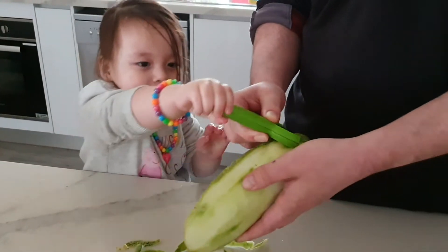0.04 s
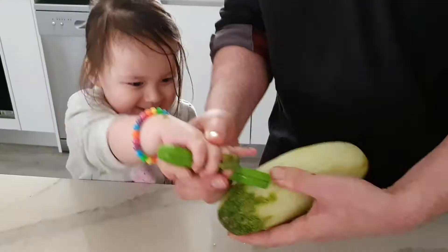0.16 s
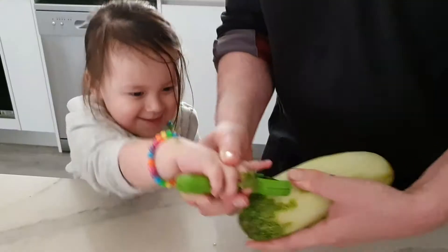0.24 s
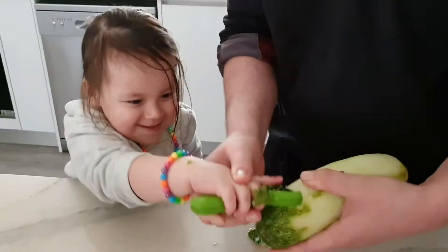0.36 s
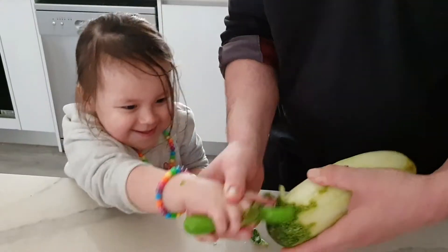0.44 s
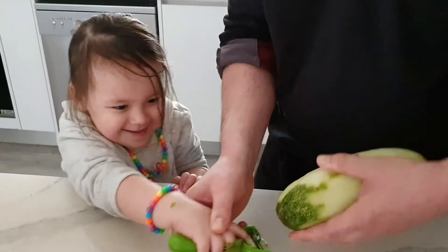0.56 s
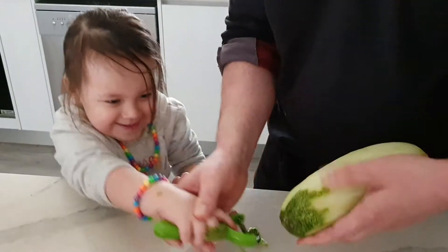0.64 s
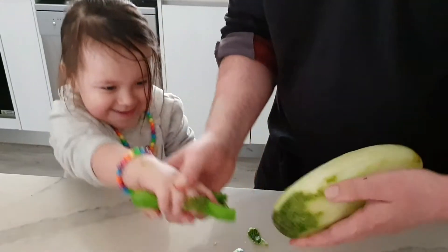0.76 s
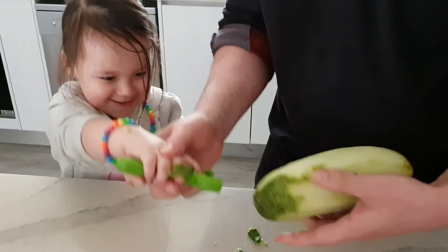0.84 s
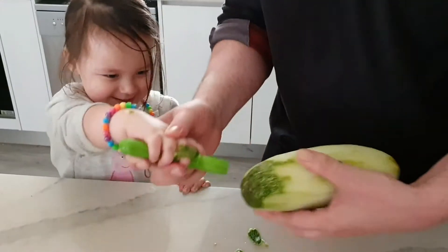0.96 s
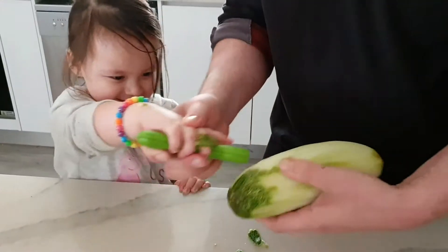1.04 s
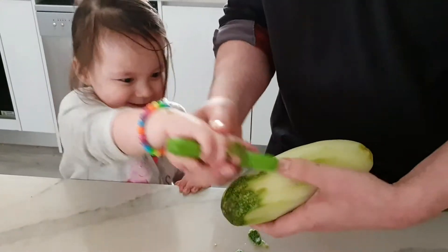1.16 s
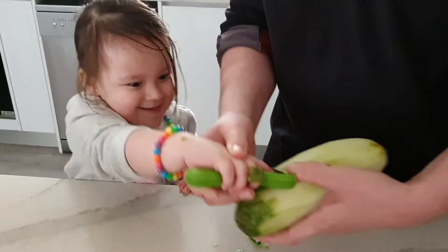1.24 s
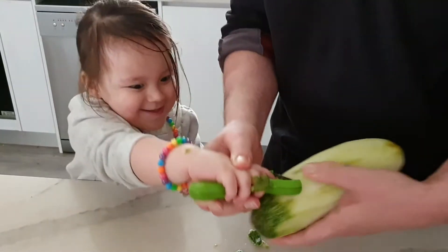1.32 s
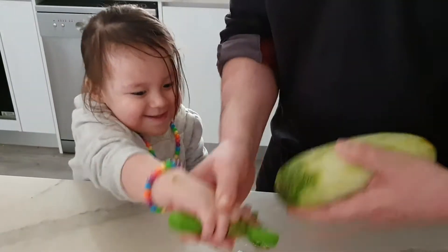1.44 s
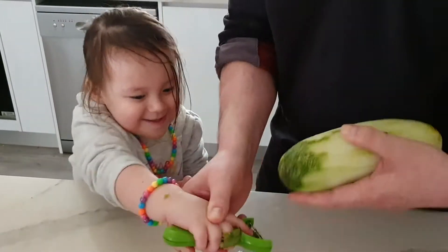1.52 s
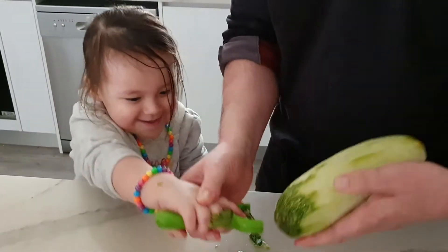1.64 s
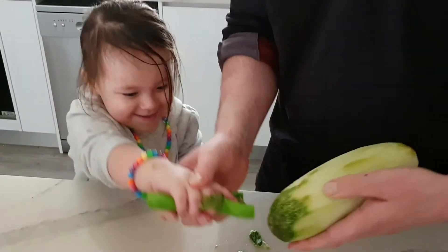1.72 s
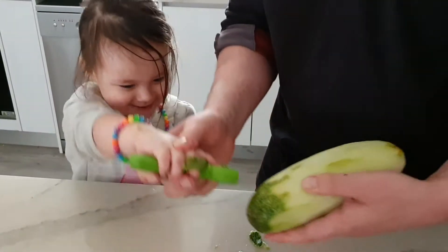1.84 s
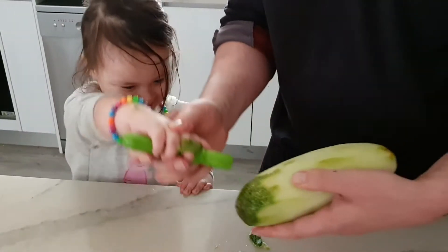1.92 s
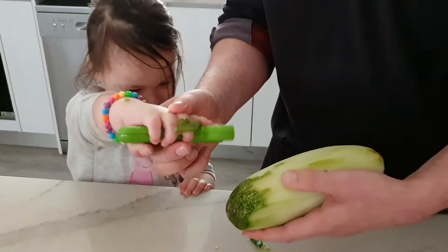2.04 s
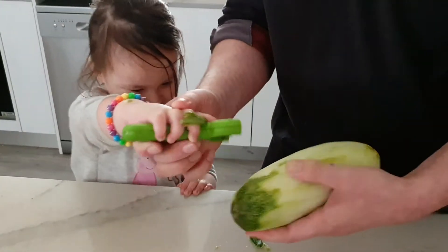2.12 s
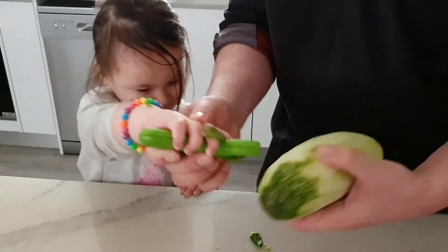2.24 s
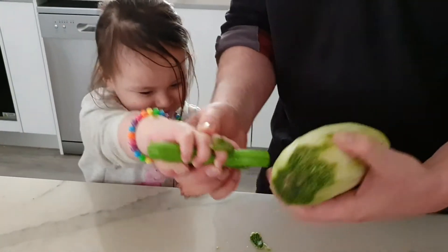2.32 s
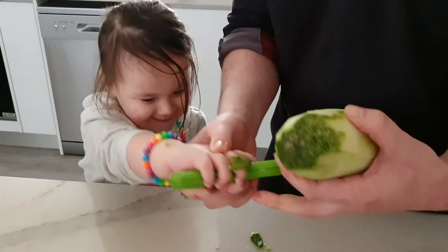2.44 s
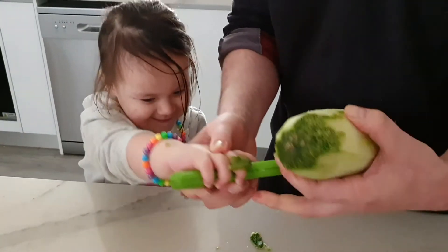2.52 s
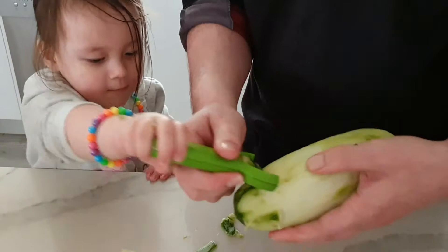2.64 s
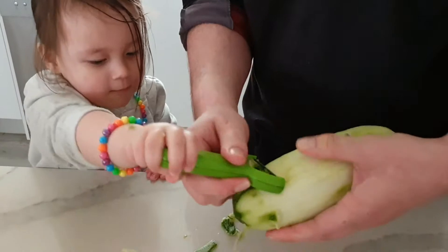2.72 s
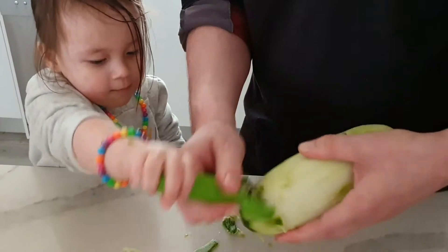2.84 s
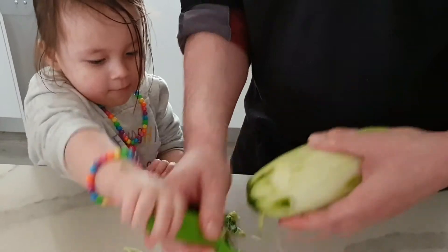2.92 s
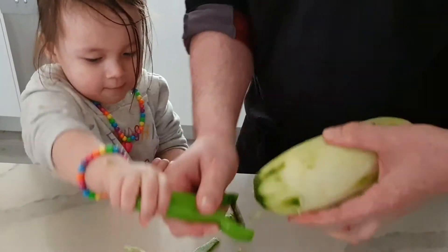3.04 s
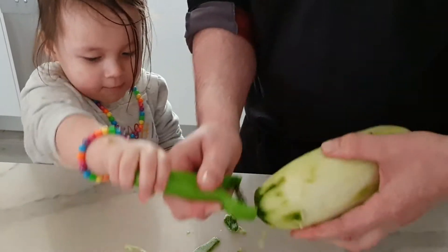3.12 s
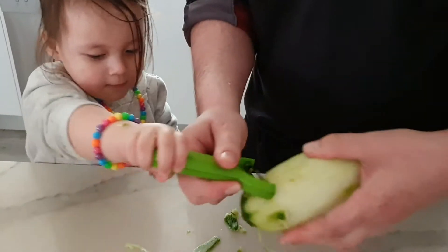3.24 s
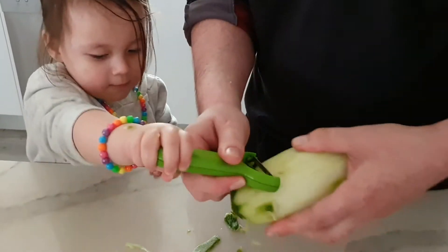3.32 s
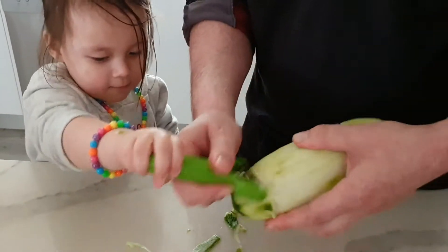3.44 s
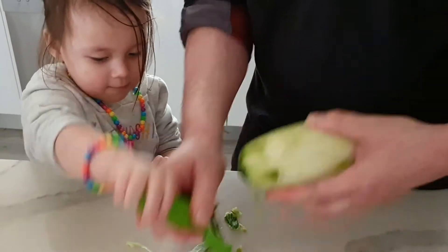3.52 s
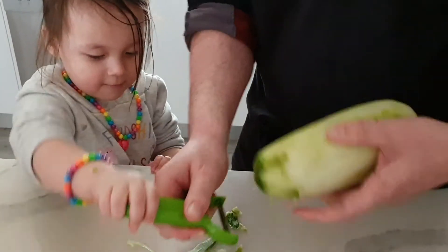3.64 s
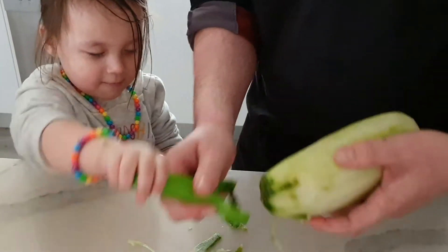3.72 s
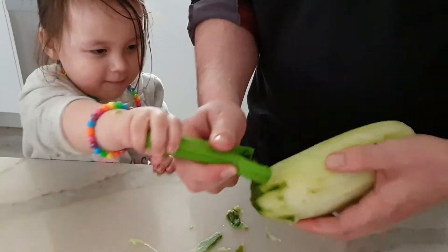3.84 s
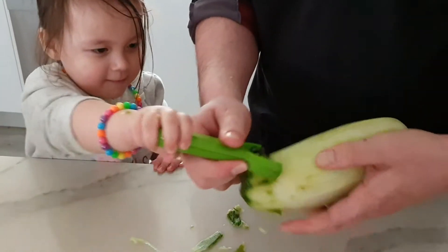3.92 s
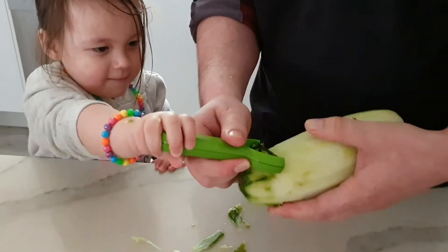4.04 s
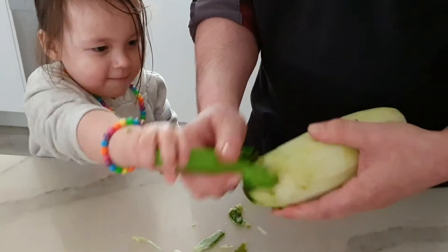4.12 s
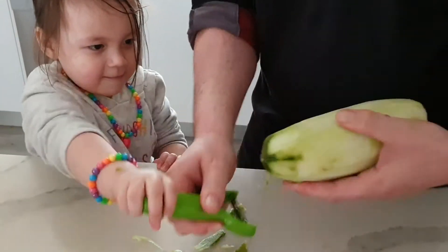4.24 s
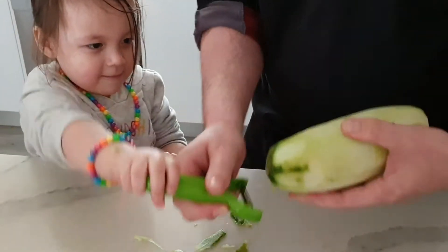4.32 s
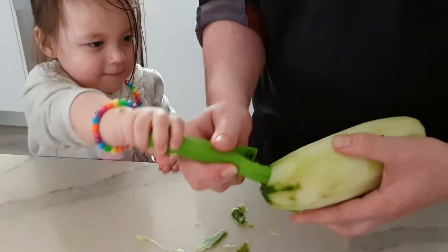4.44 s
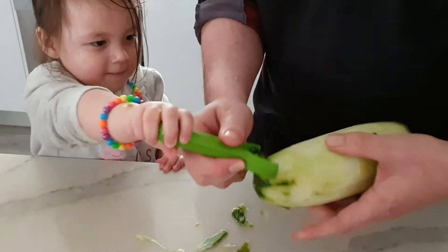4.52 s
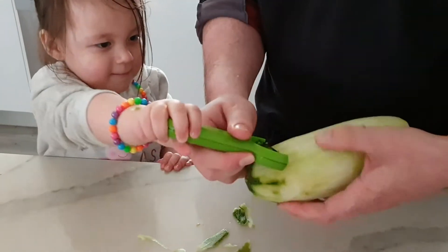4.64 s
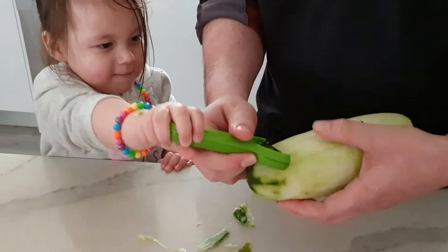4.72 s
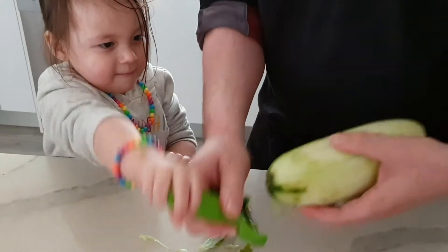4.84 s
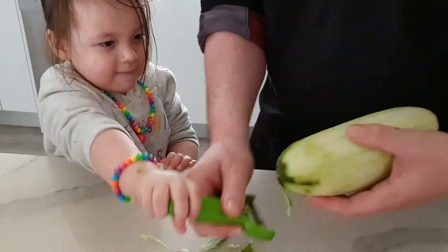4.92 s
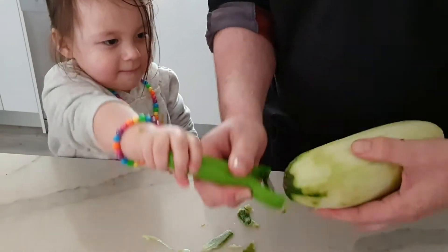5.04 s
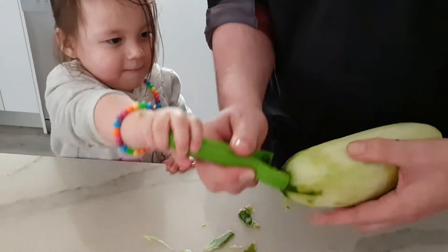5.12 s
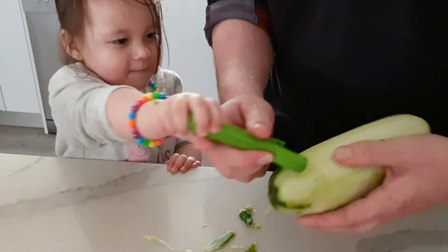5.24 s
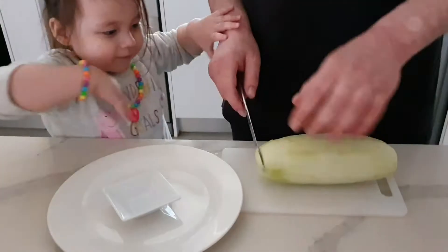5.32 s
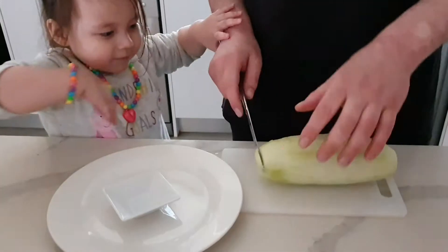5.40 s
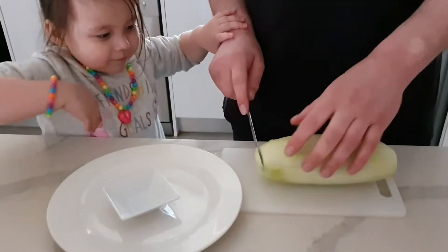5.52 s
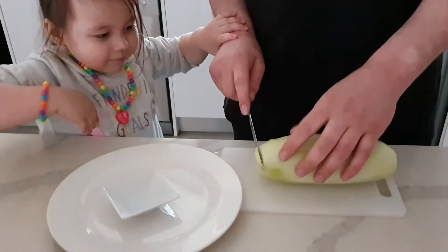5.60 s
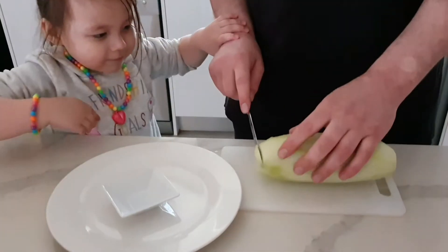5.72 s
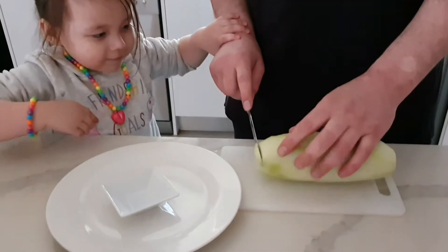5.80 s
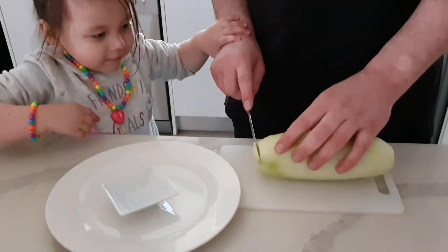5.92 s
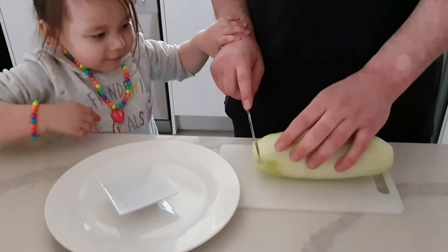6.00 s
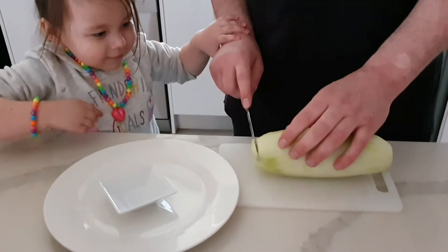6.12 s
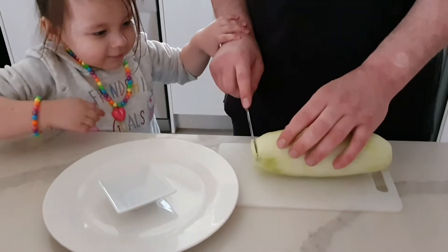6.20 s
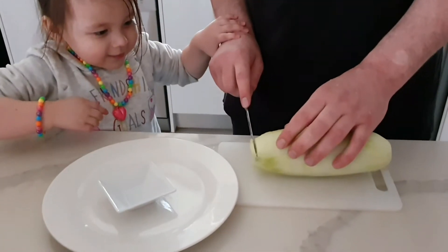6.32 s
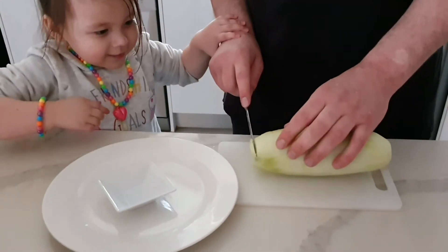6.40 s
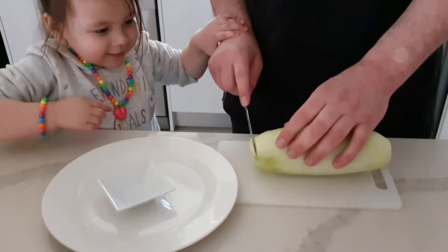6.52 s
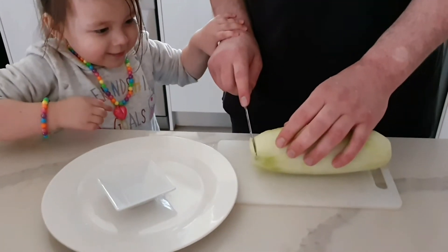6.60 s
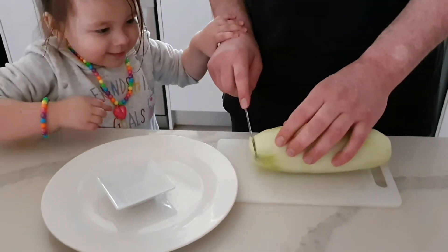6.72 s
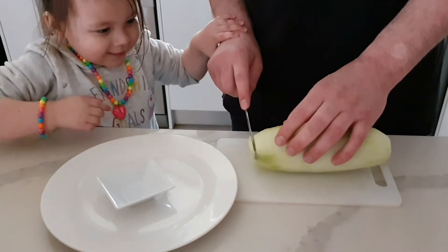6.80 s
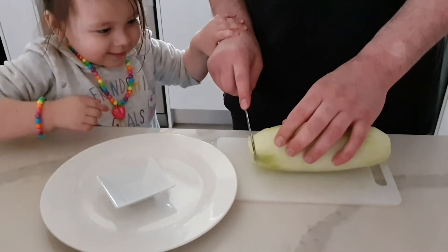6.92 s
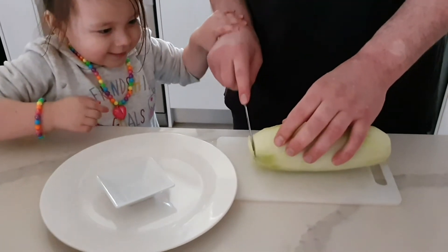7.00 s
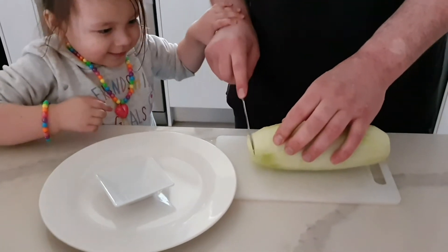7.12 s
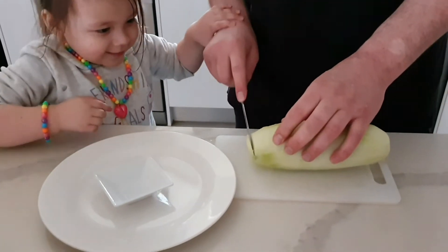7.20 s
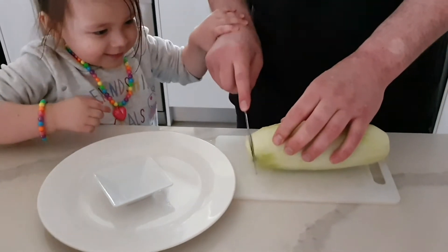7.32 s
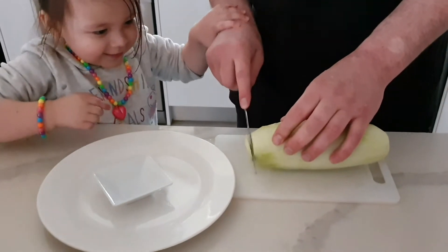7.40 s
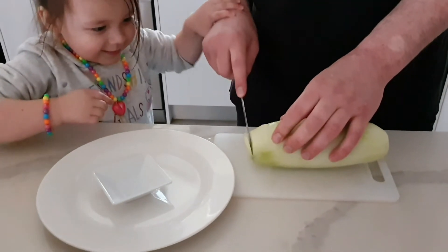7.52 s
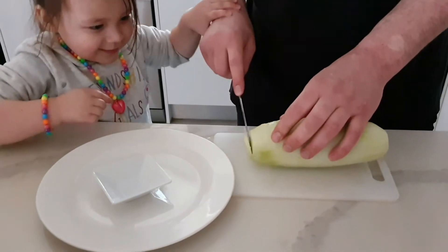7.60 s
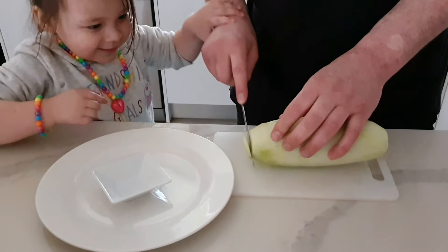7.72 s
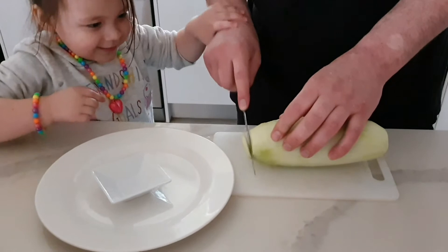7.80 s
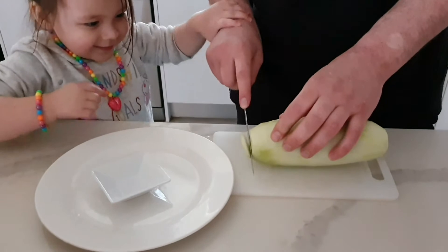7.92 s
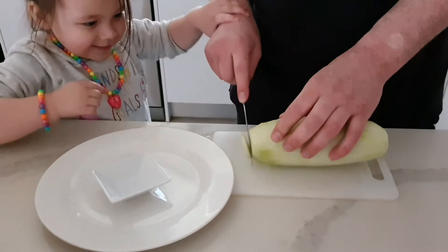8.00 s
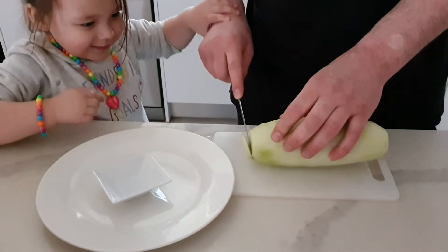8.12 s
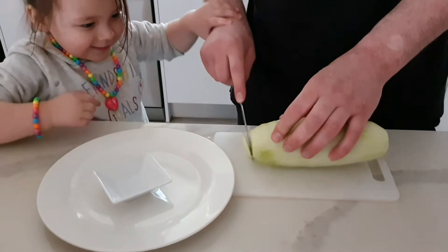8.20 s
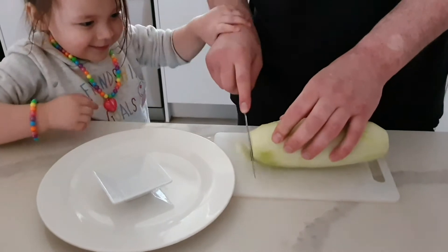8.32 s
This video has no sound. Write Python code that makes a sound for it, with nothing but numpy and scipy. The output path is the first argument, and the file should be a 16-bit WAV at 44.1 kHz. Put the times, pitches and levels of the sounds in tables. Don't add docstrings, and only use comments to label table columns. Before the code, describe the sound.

A hand peeler scrapes and snaps off a firm vegetable in short bright strokes, blade rattling, then a knife faintly saws wet flesh in a humming kitchen.

```python
import sys
import numpy as np
from scipy import signal
from scipy.fft import rfft, irfft, next_fast_len
from scipy.io import wavfile
from scipy.ndimage import uniform_filter1d, map_coordinates

SR = 44100
rng = np.random.default_rng(int(sys.argv[2]) if len(sys.argv) > 2 else 0)


def invert_db(level):
    return 10 ** (np.asarray(level, dtype=float) / 20)


def file_out(sig):
    cols = np.atleast_2d(sig).T
    lim = np.clip(cols, -1, 1)
    pcm = np.round(lim * 32767).astype(np.int16)
    wavfile.write(sys.argv[1], SR, pcm)


N = 368631


def unit(x):
    return x / np.sqrt(np.mean(x ** 2) + 1e-20)


def along(points, hz):
    f, v = np.transpose(points)
    return np.interp(np.log(hz + 1), np.log(f + 1), v)


def curves(rows):
    s, *cols = np.transpose(rows)
    return [np.interp(np.arange(N) / SR, s, c) for c in cols]


def wobble(rate, length=N):
    knots = rng.standard_normal(int(length * rate / SR) + 4)
    return map_coordinates(knots, [np.arange(length) * rate / SR])


def swells(rows, steady_db):
    t = np.arange(N) / SR
    return invert_db(steady_db) + sum(invert_db(db) * np.exp(-((t - s) / half) ** 2) for s, db, half in rows)


def filtered(x, response):
    m = next_fast_len(x.shape[-1] + 8192)
    spectrum = rfft(x, m) * response(np.fft.rfftfreq(m, 1 / SR))
    return irfft(spectrum, m)[..., :x.shape[-1]]


def peak(f, hz, width_hz):
    return 1j * f * width_hz / (hz * hz - f * f + 1j * f * width_hz)


def coloured(x, spectrum):
    return unit(filtered(x, lambda f: invert_db(along(spectrum, f))))


def gritty(grit_db):
    return rng.standard_normal(N) * invert_db(grit_db * wobble(500) + grit_db * wobble(70))


def half_shared_noise(own):
    return rng.standard_normal(N) + own * rng.standard_normal((2, N))


def appliances():
    # time in seconds, level in dB
    hum = [(0.0, -62.5), (8.36, -64)]
    # frequency in Hz, density in dB per Hz
    hum_colour = [(35, -41), (60, -14), (86, -7.5), (109, -10), (187, -8), (286, -8.5), (329, -4),
                  (396, -8), (559, -11), (1010, -15), (1830, -25.5), (2500, -35), (3250, -68.5),
                  (5500, -120)]
    # frequency in Hz, left-right likeness from 0 to 1
    likeness = [(60, 0.98), (180, 0.73), (400, .7), (800, 0.3), (1650, 0.032), (5000, 0)]
    # frequency in Hz, width in Hz, level in dB
    drone_rows = [(335, 27, -75), (483, 4.3, -75)]
    # centre in seconds, level in dB, half length in seconds
    surges = [(.65, -62, .12), (1.29, -59, .05), (1.47, -57, .05), (3.5, -65, .15), (4.2, -71, .1),
              (6.3, -71, .2)]

    def mid_side(f):
        angle = np.arccos(np.clip(along(likeness, f), -1, 1)) / 2
        return invert_db(along(hum_colour, f)) * [np.cos(angle), np.sin(angle)]

    mid, side = filtered(rng.standard_normal((2, N)), mid_side)
    air = invert_db(curves(hum)[0] + 1.2 * wobble(11)) * unit(np.array([mid + side, mid - side]))
    drones = 0
    for hz, width_hz, db in drone_rows:
        drones = drones + invert_db(db) * unit(filtered(half_shared_noise(.4), lambda f: peak(f, hz, width_hz)))
    motor = unit(filtered(half_shared_noise(0.35), lambda f: peak(f, 183, 20)))
    return air + drones + swells(surges, steady_db=-74) * invert_db(3 * wobble(4)) * motor


def microphone_hiss():
    # frequency in Hz, density in dB per Hz
    hiss_colour = [(1290, -35), (2200, -3), (4000, -5), (4420, -11), (6690, -8), (7520, -17), (12300, -11),
                   (14800, -12.5), (16000, -19)]
    return invert_db(-83.5) * coloured(rng.standard_normal((2, N)), hiss_colour)


def handling():
    # frequency in Hz, density in dB per Hz
    rumble_colour = [(20, -42), (35, -13.5), (55, -1), (80, -11.5), (120, -18.5), (200, -66.5)]
    # centre in seconds, level in dB, half length in seconds
    jolts = [(.08, -58, .04), (.24, -52, .06), (.42, -57, .1), (.6, -57, .1), (.9, -63, .13),
             (1.15, -63, .1), (1.36, -53, .09), (1.65, -63, .15), (2.05, -69, .1), (2.33, -64, .08),
             (2.68, -66, .06), (2.88, -60, .05), (3.2, -62, .1), (3.42, -61, .09), (3.7, -64, .1),
             (3.95, -63, .12), (4.25, -64, .06), (4.5, -70, .05), (5.15, -68, .08), (7.05, -75, .07),
             (7.3, -73, .09), (7.65, -72, .07), (8.25, -75, .1)]
    shared = coloured(rng.standard_normal(N), rumble_colour)
    own = coloured(rng.standard_normal((2, N)), rumble_colour)
    return swells(jolts, steady_db=-80) * invert_db(1.5 * wobble(6)) * (shared + 0.24 * own)


def thumps():
    # start in seconds, peak in dB, note in Hz, t60 in seconds
    bumps = [
        (0.101, -48, 79, 0.1),
        (2.301, -43.5, 117, 0.092),
        (2.503, -55, 109, 0.078),
        (6.207, -56, 196, 0.079),
    ]
    out, t = np.zeros(N + SR), np.arange(SR // 2) / SR
    for s, db, hz, t60 in bumps:
        soft_start = 1 - np.exp(-t / 0.025)
        out[round(s * SR):][:len(t)] += invert_db(db + 23 - 60 * t / t60) * soft_start * np.sin(2 * np.pi * hz * t)
    return out[:N]


def rustles():
    # start in seconds, level in dB, length in seconds, centre in Hz, width in Hz
    puffs = [
        (.09, -69, 0.038, 300, 500),
        (2.285, -59, 0.092, 493, 930),
        (2.29, -76, 0.16, 2500, 2900),
        (2.425, -57.5, .07, 2650, 605),
        (2.435, -62.5, 0.068, 1740, 450),
        (2.425, -69.5, 0.076, 6200, 2500),
        (5.372, -59.5, 0.011, 1600, 700),
        (2.693, -60, .05, 1400, 700),
        (5.372, -75.5, .01, 6000, 6000),
    ]
    out = np.zeros(N)
    for s, db, length, hz, width_hz in puffs:
        u = np.arange(round(3 * length * SR)) / (length * SR)
        puff = unit(filtered(rng.standard_normal(SR // 2), lambda f: peak(f, hz, width_hz) ** 2))
        out[round(s * SR):][:len(u)] += invert_db(db + 10.5) * 4 * u * np.exp(-4 * u) * puff[:len(u)]
    return out


def knife():
    # frequency in Hz, density in dB per Hz
    hiss_colour = [(4470, -62), (7600, -17), (9360, -8), (11500, 2), (12500, -6.5), (13100, -3),
                   (13900, -2), (16000, -22.5)]
    body_colour = [(700, -45), (1040, 3.5), (1500, -12.5), (1950, 1.5), (2400, -12), (3000, -26),
                   (3600, -12), (4300, -11), (5400, -15), (6500, -5.5), (7200, -13.5), (7700, -35),
                   (9500, -59.5)]
    # start in seconds, length in seconds, hiss at full speed in dB,
    # body in dB relative to that
    rubs = [
        (6.79, .15, -80, -4),
        (6.95, .21, -72, 2),
        (7.16, .27, -68, 1),
        (7.44, .1, -79, -4),
        (7.5, .18, -72, -6),
        (7.66, .26, -68, 2),
        (7.95, .25, -76, -7),
        (8.2, .28, -74, 2),
    ]
    speed_power, body_gain_db, rest_db = 2.0, 0.1, -89
    t = np.arange(N) / SR
    hiss = body = invert_db(rest_db) * np.clip((t - 6.7) / 0.04, 0, 1)
    for s, length, db, body_db in rubs:
        speed = np.abs(np.sin(np.pi * np.clip((t - s) / length, 0, 1))) ** speed_power
        hiss = hiss + invert_db(db - 1) * speed
        body = body + invert_db(db + body_db) * speed
    slide = gritty(grit_db=1.03) * invert_db(2.5 * wobble(18))
    return hiss * coloured(slide, hiss_colour) + invert_db(body_gain_db) * body * coloured(slide, body_colour)


def knocks():
    # time in seconds, peak in dB, ring in Hz,
    # brightness in dB relative to the ring
    landings = [(0.5524, -21, 4210, -15.5), (1.2296, -32, 4520, -19.5), (2.694, -34, 4240, -25),
                (2.809, -44, 5460, -25), (2.8569, -33.5, 2860, -25), (3.2814, -36.5, 4550, -26),
                (3.3039, -24.5, 4000, -12), (3.475, -31, 4730, -21.5), (3.5044, -15, 4650, -6),
                (3.5154, -25, 4380, -15.5), (3.9355, -34, 4070, -12), (4.1884, -22.5, 4100, -9),
                (4.2744, -37, 4080, -9.5), (4.5424, -29.5, 3970, -9.5), (4.8424, -23, 4720, -12.5)]
    chatter = [(0.5626, -16, 4190, -16), (0.5714, -32.5, 4250, -15), (1.2436, -20, 3930, -18),
               (1.2514, -29, 4270, -26.5), (1.4222, -33, 4040, -26.5), (1.4316, -25.5, 4120, -24),
               (1.4416, -28.5, 4170, -21.5), (1.4865, -17, 4160, -22), (2.8823, -25, 2640, -18),
               (2.9073, -22, 4360, -15.5), (3.49, -28, 4390, -20), (4.1036, -44.5, 5050, -13),
               (4.1809, -21, 4270, -14.5), (4.1964, -26.5, 4280, -23.5), (4.5351, -23, 4010, -7.5),
               (4.8504, -27.5, 4280, -21)]
    # start in seconds, note in Hz, level in dB, t60 in seconds
    singing = [
        (.563, 3990, -55, 0.6),
        (.563, 4200, -52.5, 0.62),
        (.563, 4480, -52.5, 0.65),
        (1.487, 4535, -54.5, .7),
        (1.487, 4330, -55, 0.5),
        (1.487, 4100, -55, 0.37),
        (4.536, 4034, -49.5, 0.36),
        (4.538, 4075, -55, .45),
    ]
    hits = [row + (-23.5, -13.5) for row in landings] + [row + (-38, -18) for row in chatter]
    out, t = np.zeros((2, N + SR)), np.arange(SR // 2) / SR
    for s, db, ring_hz, bright_db, dull_db, handle_db in hits:
        crack = rng.standard_normal((4, 2, 2048)) * np.exp(-(t[:2048] / 0.0042) ** 3)
        crack[:, 1] = np.arange(2048) == 0
        ring_widths = np.array([[700], [1100]])
        ring = filtered(crack[0], lambda f: peak(f, ring_hz, ring_widths) + 0.096 * peak(f, 4800, 4000) ** 2)
        top = filtered(crack[1], lambda f: peak(f, 11500, 8300) ** 2)
        dull = filtered(crack[2], lambda f: peak(f, 900, 900) ** 2)
        handle = filtered(crack[3], lambda f: peak(f, 2700, 2000) ** 2)
        parts = [(ring, [[0], [-1.5]]), (top, bright_db + 3.5), (dull, dull_db + 2),
                 (handle, handle_db + np.array([[2.5], [5]]))]
        for part, gain_db in parts:
            level = invert_db(db - 21) * invert_db(gain_db)
            out[:, round(s * SR):][:, :2048] += level * np.array([unit(part[0]), unit(part[1])])
    for s, hz, db, t60 in singing:
        decay = invert_db(db - 60 * t / t60 + 3.5 * wobble(60, len(t))) * (1 - t / t[-1])
        note = np.sin(2 * np.pi * hz * t + 1.6 * wobble(70, len(t)))
        out[:, round(s * SR):][:, :len(t)] += decay * note
    return out[:, :N]


def peeling():
    # frequency in Hz, width in Hz, level in dB
    blade_modes = [(1850, 250, -7), (2640, 380, -2.5), (3327, 510, -4.5), (4150, 330, 2.5), (6700, 500, -9)]
    # frequency in Hz, density in dB per Hz
    skin_colour = [(410, -51), (700, -22), (1150, -13.5), (1390, 6.5), (1820, -2.5), (4120, 2), (5210, -23),
                   (8000, -27), (10400, -58), (17600, -120)]
    fizz_colour = [(4120, -27.5), (7000, 1.5), (8580, -2), (10700, 5.5), (12600, -2.5), (13600, -2),
                   (16000, -15.5)]
    # start in seconds, end in seconds,
    # first level in dB, last level in dB, loose resonance in Hz
    drags = [(0.0, .09, -50.5, -70, 3800), (.203, .39, -51, -74, 4000), (.392, .42, -68, -55, 4200),
             (.42, .525, -54, -41, 3600), (.53, .552, -45, -37, 3200), (1.218, 1.229, -62, -56, 4300),
             (1.231, 1.243, -45, -42, 4200), (1.255, 1.346, -47, -54, 3900), (1.35, 1.446, -53, -39, 4200),
             (1.452, 1.484, -46, -44, 4200), (2.575, 2.66, -64, -82, 3300), (2.695, 2.74, -52, -62, 2600),
             (2.775, 2.85, -70, -53, 3800), (2.857, 2.925, -47, -42, 3200), (3.272, 3.301, -56, -46, 4400),
             (3.395, 3.47, -62, -54, 4100), (3.472, 3.49, -48, -44, 3800), (3.512, 3.54, -36, -42, 3200),
             (3.938, 3.965, -43, -50, 3700), (4.04, 4.135, -70, -41, 4400), (4.135, 4.176, -41, -41, 4300),
             (4.18, 4.21, -35, -41, 3700), (4.54, 4.57, -45, -52, 3600), (4.777, 4.815, -61, -41, 4000),
             (4.815, 4.865, -41, -42, 4100)]
    firm_db = -45

    gate, knots = np.zeros(N), []
    for start, end, first_db, last_db, hz in drags:
        gate[round(start * SR):round(end * SR)] = 1
        knots += [(start, first_db, hz), (end, last_db, hz)]
    gate = uniform_filter1d(gate, size=200)
    drag_db, loose_hz = curves(knots)
    pressure_db = drag_db - firm_db
    fizz_db = -19 + .25 * pressure_db + 2.6 * np.arange(N) / SR + 2.5 * wobble(30)

    tear = gritty(grit_db=2.6)
    blade = 0
    for hz, width_hz, db in blade_modes:
        favoured_db = -8 * np.abs(np.log2(loose_hz / hz)) + 3.2 * wobble(22)
        blade = blade + invert_db(db + favoured_db) * unit(filtered(tear, lambda f: peak(f, hz, width_hz)))
    glide_hz = 5250 + 40 * pressure_db
    shiver = unit(filtered(gritty(grit_db=2.0), lambda f: 1 / (1 + 1j * f / 90)))
    rising = invert_db(-1) * shiver * np.sin(2 * np.pi * np.cumsum(glide_hz) / SR)
    body = unit(blade) + rising + .55 * coloured(tear, skin_colour)
    return gate * invert_db(drag_db - 4.5) * (body + invert_db(fizz_db + 3.5) * coloured(tear, fizz_colour))


def counter(x):
    echoes = np.zeros((2, SR // 20))
    delays_s = rng.uniform(.0008, 0.033, (2, 14))
    sizes = rng.choice([-1, 1], (2, 14)) * invert_db(-6.5 - 60 * delays_s / 0.057)
    for port in range(2):
        echoes[port, (delays_s[port] * SR).astype(int)] = sizes[port]
    return signal.fftconvolve(x[None], echoes, axes=1)[:, :N]


def kitchen(x):
    # frequency in Hz, t60 in seconds
    decay_times = [(300, .7), (2000, 0.58), (4000, 0.49), (8000, 0.49), (14000, .4)]
    changes = [0, .18, 2.555, 5.29, 8.4]
    out = np.zeros((2, N + 2 * SR))
    for start, end in zip(changes, changes[1:]):
        part = np.zeros_like(out)
        for s in np.arange(start, end, .3):
            a, b = round(s * SR), round(min(s + .3, end) * SR)
            hz, t, z = signal.stft(rng.standard_normal((2, SR * 2 // 3)), SR, nperseg=256)
            decay = invert_db(-60 * t / along(decay_times, hz)[:, None])
            tail = signal.istft(z * decay, SR, nperseg=256)[1]
            wet = signal.fftconvolve(x[None, a:b], tail / np.linalg.norm(tail[0]), axes=1)
            part[:, a + 250:][:, :wet.shape[1]] += wet
        out[:, :round(end * SR)] += part[:, :round(end * SR)]
    return out[:, :N]


def fades():
    # start in seconds, end in seconds, fade-in in seconds, fade-out in seconds
    stretches = [
        (-1.0, .165, .4, 1.4),
        (.202, 2.543, .42, .55),
        (2.574, 5.272, .4, .48),
        (5.31, 9.4, .5, .4),
    ]
    t = np.arange(N) / SR
    gain = 0
    for start, end, rise, fall in stretches:
        ramp = np.clip(.06 + np.minimum((t - start) / rise, (end - t) / fall), 0, 1)
        gain = gain + (t > start) * (t < end) * ramp
    return gain


def scene():
    # frequency in Hz, left over right in dB
    lean = [(60, 2), (150, 0.5), (380, 1.0), (950, 11), (2380, 8.5), (5980, 7.5), (10000, 5), (15000, -1)]
    # frequency in Hz, left lead in radians
    lead = [(500, 1.26), (2400, .6), (5000, -1.1), (6800, 0.12), (7900, -2.5), (9300, 1.5), (11400, -0.7),
            (15000, -1.9)]
    # frequency in Hz, level in dB
    wall_colour = [(500, 5.5), (1500, -1), (3000, 3.5), (4500, 1.5), (6000, -2.5), (8000, 5.5),
                   (11000, -1.5), (15000, -9.5)]
    slap, spread = knocks()
    drag = peeling()
    blade = knife() + rustles()
    half = np.array([[.5], [-.5]])
    direct = filtered(slap + drag, lambda f: invert_db(half * along(lean, f)) * np.exp(1j * half * along(lead, f)))
    sent = spread + drag + .5 * blade
    room = counter(sent) + invert_db(-4.5) * kitchen(sent)
    wet = filtered(room, lambda f: invert_db(along(wall_colour, f)))
    near = direct + blade * invert_db([[.3], [-.3]]) + wet * invert_db([[1.6], [-1.6]])
    return near + thumps() + appliances() + microphone_hiss() + handling()


def band_limit(x):
    return signal.sosfilt(signal.butter(12, 16510, fs=SR, output="sos"), x)


def record(dry):
    heard = filtered(dry, lambda f: f < 16350) * fades()
    return band_limit(heard)


dry = scene()
out = record(dry)
file_out(out)
```